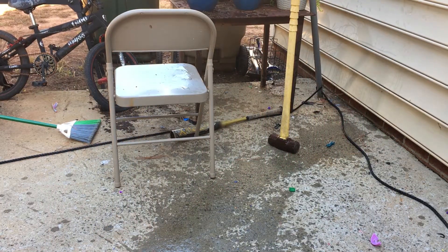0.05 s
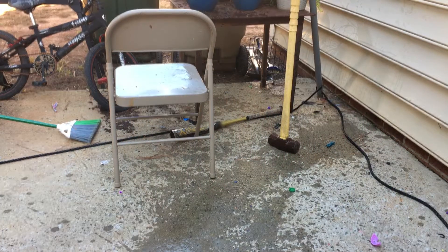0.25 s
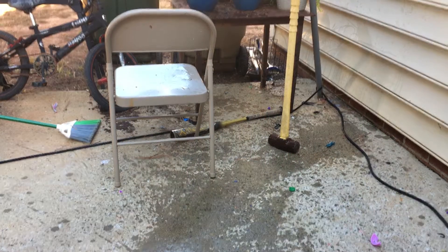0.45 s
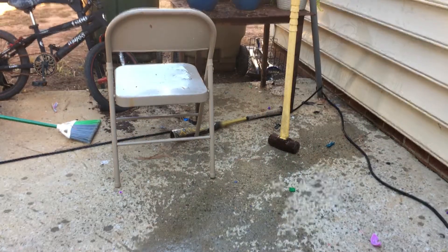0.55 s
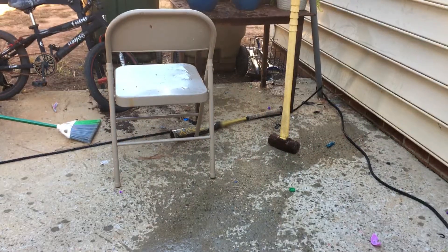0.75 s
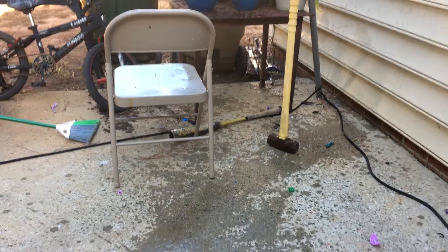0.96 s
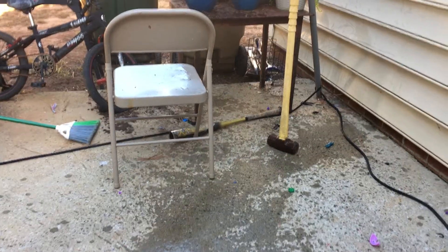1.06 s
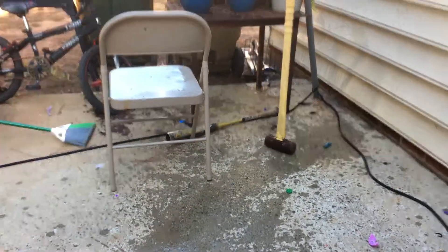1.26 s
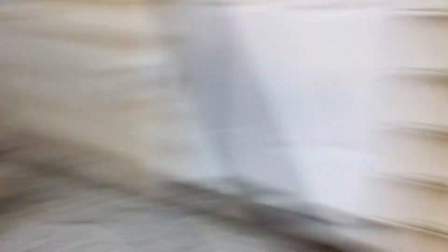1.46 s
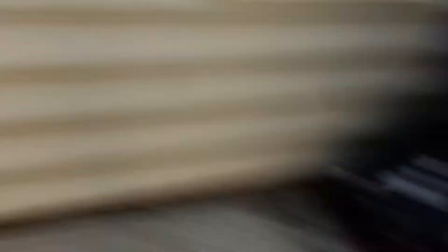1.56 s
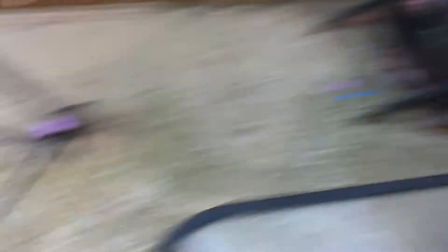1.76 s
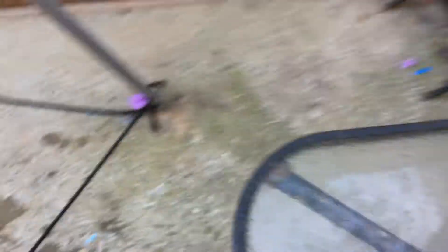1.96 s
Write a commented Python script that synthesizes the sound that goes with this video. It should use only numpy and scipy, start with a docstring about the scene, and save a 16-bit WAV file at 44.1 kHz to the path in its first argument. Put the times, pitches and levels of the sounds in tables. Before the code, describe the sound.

A hard object knocks sharply against something hollow at about 0.25 seconds and bounces several times, weakening by 0.6. It scrapes near 0.8, then lands on concrete at 0.9 with a duller thud, a short skid and a low ring. Close handling rustle swells around 1.4 seconds, followed by small sharp clicks at the microphone, strongest near 1.7. A faint outdoor rumble lies underneath throughout.

```python
"""Clatter on a concrete patio

A hard object knocks and bounces against something hollow, ringing its modes, and the yard answers.
It scrapes, lands with a duller thud, skids and leaves a low ring. Then the camera is swung round:
rustling and small sharp clicks of its casing, close to the microphone, over a faint outdoor rumble."""
import sys
import numpy as np
from scipy import signal
from scipy.fft import rfft, irfft
from scipy.io import wavfile

SR = 44100
rng = np.random.default_rng(int(sys.argv[2]) if len(sys.argv) > 2 else 0)


def generate_wav(sig):
    """Save sig (samples, or channels by samples) to the path in sys.argv[1] as 16-bit PCM at SR."""
    pcm = np.round(np.clip(np.atleast_2d(sig).T, -1, 1) * 32767).astype(np.int16)
    wavfile.write(sys.argv[1], SR, pcm)


N = 88200
T, FREQ_HZ = np.arange(N) / SR, np.fft.rfftfreq(N, 1 / SR)
RING_T = T[:SR * 3 // 4]  # time axis of one struck sound


def amp(db):
    """Decibels to gain."""
    return 10 ** (np.asarray(db) / 20)


def unit_rms(x):
    """Scales to rms 1."""
    return x / np.sqrt(np.mean(x ** 2) + 1e-20)


def curve_at(points, hz):
    """Reads a table on a log-frequency axis."""
    freq_hz, value = np.transpose(points)
    return np.interp(np.log(hz + 1), np.log(freq_hz + 1), value)


def add(mix, start_s, sound):
    """Mixes a sound in at a time."""
    part = mix[round(start_s * SR):][:len(sound)]
    part += sound[:len(part)]


def decay(t60_s):
    """Exponential decay, 60 dB down at t60_s."""
    return np.exp(-np.log(1000) * RING_T / t60_s)


def colour(x, gains, size=4096):
    """Minimum-phase filter through points of freq_hz, gain_db."""
    log_gain = curve_at(gains, abs(np.fft.fftfreq(size, 1 / SR))) * np.log(10) / 20
    response = np.exp(np.conj(signal.hilbert(log_gain)))
    taps = np.fft.ifft(response).real[:size // 2]
    return signal.fftconvolve(x, taps)[:len(x)]


def whitened(x):
    """Evens out the broad colour of a burst and keeps its fine peaks."""
    hz, power = np.fft.rfftfreq(len(x), 1 / SR), abs(rfft(x)) ** 2
    edges_hz = np.geomspace(300, 20000, 26) - 280
    gains = []
    for low, high in zip(edges_hz, edges_hz[1:]):
        band_power = power[(hz >= low) & (hz < high)].mean()
        gains.append(((low + high) / 2, -10 * np.log10(band_power + 1e-20)))
    return colour(x, gains)


def burst(envelope):
    """A whitened burst of noise."""
    return whitened(rng.standard_normal(len(RING_T)) * envelope)


def dense_ring(decays):
    """Countless close modes: noise whose bands each die at their own speed."""
    hz, spectrum = np.fft.rfftfreq(len(RING_T), 1 / SR), rfft(rng.standard_normal(len(RING_T)))
    centres_hz, t60s = zip(*decays)
    bands = [curve_at(list(zip(centres_hz, weights)), hz) for weights in np.eye(len(decays))]
    return sum(irfft(spectrum * band, len(RING_T)) * decay(t60_s) for band, t60_s in zip(bands, t60s))


def mode(pitch_hz, level_db, t60_s):
    """One dying partial."""
    return amp(level_db) * decay(t60_s) * np.sin(2 * np.pi * pitch_hz * RING_T)


def modes(table):
    """Partials struck together, neighbours in opposite sense."""
    return sum((-1) ** k * mode(*row) for k, row in enumerate(table))


def grainy_noise(spectrum, levels, grain_db, grain_hz, ring_t60_s=0):
    """Grainy coloured noise on a level curve, through a surface that may ring."""
    white = rng.standard_normal(N)
    wander = unit_rms(irfft(rfft(rng.standard_normal(N)) / (1 + (FREQ_HZ / grain_hz) ** 4), N))
    grains = white * amp(grain_db * wander)
    if ring_t60_s:
        grains = signal.fftconvolve(grains, burst(decay(ring_t60_s)))[:N]
    shaped = irfft(rfft(grains) * amp(curve_at(spectrum, FREQ_HZ)), N)
    return unit_rms(shaped) * amp(np.interp(T, *np.transpose(levels)))


# open air over the patio: freq_hz, gain_db
AIR_SPECTRUM = [(20, -3), (45, 7.5), (80, 5), (150, -3), (250, -11), (400, -26), (700, -21.5),
                (1500, -30.5), (4000, -54.5), (16000, -45)]
# its swells: time_s, relative_db
AIR_SWELLS = [(0, 7.5), (.3, 2.5), (.65, 5), (.78, 10), (.86, -7), (1.05, 6.5), (1.2, 2.5), (1.35, 3),
              (1.5, -0.5), (2, 0.5)]

def outdoors(level_db=-53.5):
    """Low rumble and faint wash of the open air around the microphone."""
    return amp(level_db) * grainy_noise(AIR_SPECTRUM, AIR_SWELLS, grain_db=1.5, grain_hz=20.7)


# soft hiss at first, two faint whistles later: peak_s, spread_s, pitch_hz, width_hz, level_db
HISS_BANDS = [(.13, .2, 3040, 792, -65), (1.52, 0.067, 3720, 320, -62.5), (1.52, 0.056, 5200, 450, -61.5)]

def hisses():
    """Narrow bands of hiss that swell and fade."""
    out = np.zeros(N)
    for peak_s, spread_s, pitch_hz, width_hz, level_db in HISS_BANDS:
        band = irfft(rfft(rng.standard_normal(N)) / (1 + (2 * (FREQ_HZ - pitch_hz) / width_hz) ** 2), N)
        swell = np.exp(-((T - peak_s) / spread_s) ** 2)
        out += amp(level_db) * swell * unit_rms(band)
    return out


# the hollow body's strongest modes: pitch_hz, level_db, t60_s
BODY_MODES = [(118.2, -29.5, 0.18), (179.7, -22, 0.13), (205.6, -26, 0.17), (341.2, -19, 0.16),
              (696, -23, 0.11), (826, -28.5, 0.064), (985, -33, 0.16), (1433, -30, 0.12), (1589, -27, .1),
              (1663, -25.5, 0.11), (1730, -31.5, 0.14), (1832, -23, 0.043), (1952, -33.5, 0.077),
              (2064, -21, 0.037), (2275, -34, 0.094), (2383, -24, 0.073), (2550, -29.5, 0.18),
              (2593, -38.5, 0.055), (3225, -45, 0.24), (3250, -26, 0.097), (4068, -20.5, 0.066)]
# what hums on after a blow: pitch_hz, level_db, t60_s
BODY_HUM = [(159.6, -42.5, 0.66), (276.6, -37.5, 0.8), (303.5, -40.5, 0.91), (330.5, -37, 0.73),
            (362, -40, 0.55)]
# colour of its many close, weaker modes: freq_hz, gain_db
BODY_SPECTRUM = [(30, -17), (70, 21), (130, 21.5), (280, 19), (500, 17), (850, 19.5), (1150, 16),
                 (1800, 20.5), (2500, 19.5), (3500, 17.5), (5000, 11), (8000, 0), (16000, -13)]
# their decay: freq_hz, t60_s
BODY_DECAY = [(100, 0.23), (400, 0.23), (1500, 0.13), (4000, 0.11), (12000, 0.078)]
# reverberation of the yard: freq_hz, t60_s
YARD_DECAY = [(150, 0.51), (1000, 0.28), (4000, 0.42), (12000, 0.33)]
# bands of a blow's strength: freq_hz
BLOW_BANDS = [150, 700, 2100, 4500, 12000]
# blows out on the patio: start_s, then gain_db at each of BLOW_BANDS
BLOWS = [(.2450, -1, 1, 1, 1, 3), (0.2988, -14.5, -8.5, -10, -15.5, -27), (0.4511, 1, -4.5, -9, -13, -10),
         (0.5343, -8, -7, -9, -25, -10), (0.6274, -19, -25, -38, -30.5, -17),
         (0.8819, -12, -21.5, -34, -37.5, -18), (.8960, -6, -1, -19, -55, -10),
         (.9030, -22.5, -14, -21.5, -21.5, -11), (0.9387, -9.5, -16.5, -21.5, -33, -16)]

def knocks(likeness=0.86, spot_db=2, crack_db=1, crack_s=0.0039, rise_s=0.00066, yard_db=-22.5):
    """Each blow cracks and rings the hollow body, varying with the spot struck; the yard answers."""
    out, body = np.zeros(N), dense_ring(BODY_DECAY)
    crack = 1 + amp(crack_db) * np.exp(-RING_T / crack_s)
    build_up = 1 - np.exp(-RING_T / rise_s)
    for start_s, *gains_db in BLOWS:
        woken = [(hz, db + spot_db * rng.standard_normal(), t60_s) for hz, db, t60_s in BODY_MODES]
        ring = (modes(woken) + modes(BODY_HUM)) * build_up
        close_modes = likeness * body + np.sqrt(1 - likeness ** 2) * dense_ring(BODY_DECAY)
        yard = amp(yard_db) * whitened(dense_ring(YARD_DECAY))
        clatter = colour(whitened(close_modes * crack) + yard, BODY_SPECTRUM)
        add(out, start_s, colour(clatter + ring, list(zip(BLOW_BANDS, gains_db))))
    return out


# faint light ticks: start_s, gain_db
CATCHES = [(0.475, -14), (0.6272, -15.5), (.741, -8), (0.751, -4), (0.814, -7), (1.363, -16)]
# their colour at the microphone: freq_hz, gain_db
TICK_SPECTRUM = [(200, -19), (800, -4.5), (3500, -4.5), (8000, -12), (16000, -16.5)]

def ticks(tip_db=-12, tip_t60_s=0.022, tail_t60_s=0.18):
    """Light catches, most of them while something slides: a sharp tip and a short tail."""
    out = np.zeros(N)
    envelope = amp(tip_db) * decay(tip_t60_s) + decay(tail_t60_s)
    for start_s, gain_db in CATCHES:
        add(out, start_s, amp(gain_db) * burst(envelope))
    return colour(out, TICK_SPECTRUM)


RUB_T60_S = 0.027  # whatever is rubbed rings briefly
# colour of the scrape on the patio: freq_hz, gain_db
SCRAPE_SPECTRUM = [(80, 24), (300, 16.5), (700, 10), (1100, 3), (1800, 0.5), (4000, -13.5), (8000, -16.5),
                   (16000, -18.5)]
# its course: time_s, level_db
SCRAPE_LEVELS = [(.735, -85), (.752, -39.5), (0.773, -52), (.79, -35.5), (0.807, -42.5), (.828, -44),
                 (0.848, -48.5), (.88, -55)]

def scrape():
    """A short scrape before the landing, then a faint low rumble that stays to the end."""
    return grainy_noise(SCRAPE_SPECTRUM, SCRAPE_LEVELS, grain_db=4, grain_hz=227, ring_t60_s=RUB_T60_S)


# further, mostly low modes woken by the landing: pitch_hz, level_db, t60_s
LANDING_MODES = [(74, -36.5, 0.5), (248, -44.5, 1), (297, -40.5, 0.74), (324, -33.5, 0.47),
                 (380, -40, 0.75), (453, -45.5, 0.74), (566.7, -24, 0.12), (636, -25, 0.13),
                 (900, -32.5, 0.15), (1980, -42, 0.32)]
# colour of the skid: freq_hz, gain_db
SKID_SPECTRUM = [(150, 2.5), (400, 1), (1100, -4), (3200, -10), (7000, -42)]
# its course: time_s, level_db
SKID_LEVELS = [(0.894, -64), (.907, -25), (.95, -34), (1.03, -75.5)]

def landing(start_s=0.896):
    """The object comes down heavily, skids roughly and leaves a low ring over the patio."""
    out = grainy_noise(SKID_SPECTRUM, SKID_LEVELS, grain_db=6.5, grain_hz=307, ring_t60_s=RUB_T60_S)
    add(out, start_s, modes(LANDING_MODES))
    return out


# colour of the handling noise, close to the microphone: freq_hz, gain_db
RUSTLE_SPECTRUM = [(150, 5.5), (600, 2.5), (1100, 5.5), (2000, -1), (3200, 1.5), (5300, -4.5), (6800, -7),
                   (11000, -14.5), (16000, -17)]
# its course: time_s, level_db
RUSTLE_LEVELS = [(0, -65.5), (.68, -70.5), (1.08, -66.5), (1.17, -59.5), (1.23, -62), (1.275, -88),
                 (1.314, -56), (1.35, -73), (1.372, -57), (1.383, -42.5), (1.415, -48.5), (1.44, -54.5),
                 (1.47, -53.5), (1.53, -57.5), (1.6, -67), (1.85, -66.5), (2, -88)]

def rustle():
    """Faint rubbing that swells into a rustle as the camera turns."""
    return grainy_noise(RUSTLE_SPECTRUM, RUSTLE_LEVELS, grain_db=2.5, grain_hz=250, ring_t60_s=RUB_T60_S)


# the camera casing's modes, for a click of 0 dB: pitch_hz, level_db, t60_s
CASING_MODES = [(559, -38.5, 0.049), (666, -33.5, 0.028), (1160, -48, 0.021), (4090, -35, 0.047),
                (5090, -44, 0.031), (6760, -34.5, 0.018), (8900, -31, 0.031), (11700, -26, 0.024),
                (13700, -29, .025)]
# bands of a click's strength: freq_hz
CLICK_BANDS = [250, 800, 2500, 7000, 14000]
# clicks right at the microphone: start_s, gain_db at each of CLICK_BANDS, pitch_hz, note_db
FINGER_CLICKS = [(1.456, -19, -25, -17, -24.5, -36, 532, -37),
                 (1.549, -15, -17.5, -35, -44, -55, 1010, -43), (1.7074, -7, 3, -6.5, 3.5, -7, 610, -40),
                 (1.716, 0.5, 1.5, -8, -7.5, -37, 934, -34.5), (1.7566, -29, -2, -18.5, -18, -37, 610, -45),
                 (1.7990, -38, -6.5, -9.5, -12, -34, 670, -40),
                 (1.8384, -39, -3, -23, -26.5, -55, 630, -34.5),
                 (1.9409, -16.5, -18, -18, -38, -81, 1022, -39.5)]

def clicks(rise_s=0.00051, snap_t60_s=0.022, tail_db=-12.5, tail_t60_s=0.096, note_t60_s=0.039):
    """Fingers shift on the camera: a snap rings the casing, with one note that depends on the spot."""
    out = np.zeros(N)
    build_up = 1 - np.exp(-RING_T / rise_s)
    envelope = build_up * (decay(snap_t60_s) + amp(tail_db) * decay(tail_t60_s))
    for start_s, *gains_db, pitch_hz, note_db in FINGER_CLICKS:
        snap = colour(burst(envelope) + modes(CASING_MODES), list(zip(CLICK_BANDS, gains_db)))
        add(out, start_s, snap + mode(pitch_hz, note_db, note_t60_s))
    return out


def scene():
    """The patio and the close handling noise, at one microphone."""
    return (knocks() + clicks() + ticks() + scrape() + landing() + rustle() + hisses() + outdoors())[None]


def record(dry):
    """The recorder's low cut and band limit."""
    low_cut_hz, top_hz = 46, 16000
    low_cut = signal.butter(2, low_cut_hz, "high", fs=SR, output="sos")
    band_limit = signal.firwin(511, top_hz, window=("kaiser", 9), fs=SR)
    return signal.oaconvolve(signal.sosfilt(low_cut, dry), band_limit[None], "same")


dry = scene()
out = record(dry)
generate_wav(out)
```